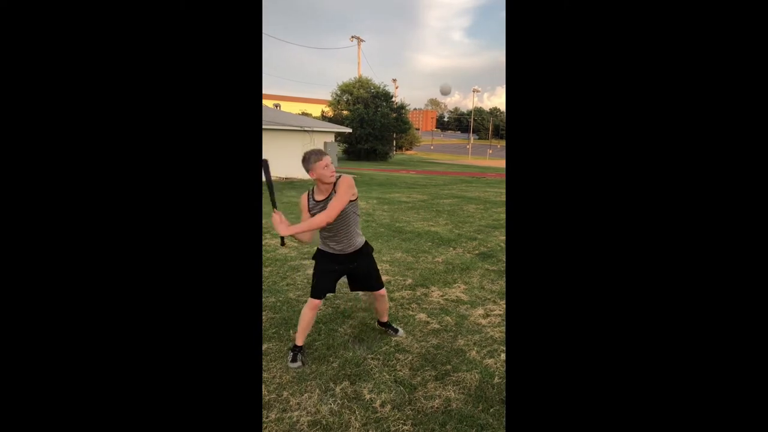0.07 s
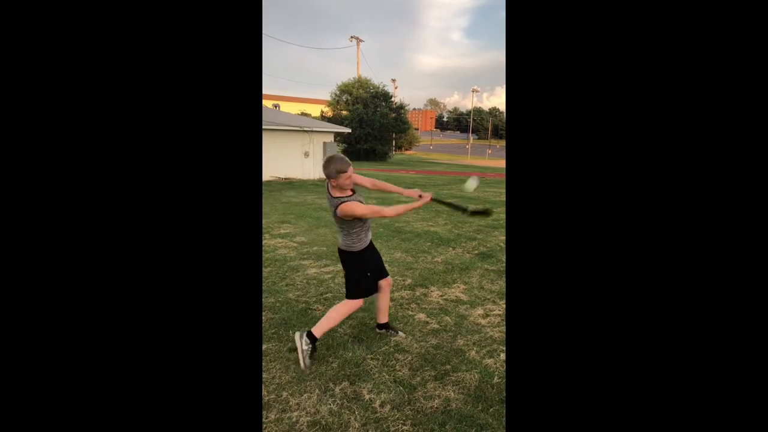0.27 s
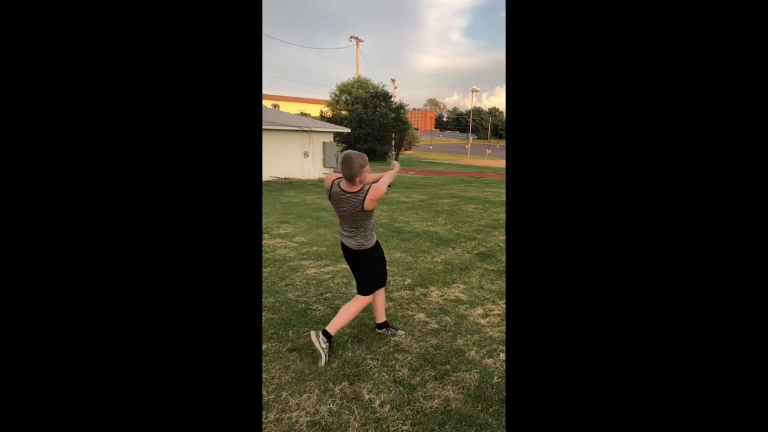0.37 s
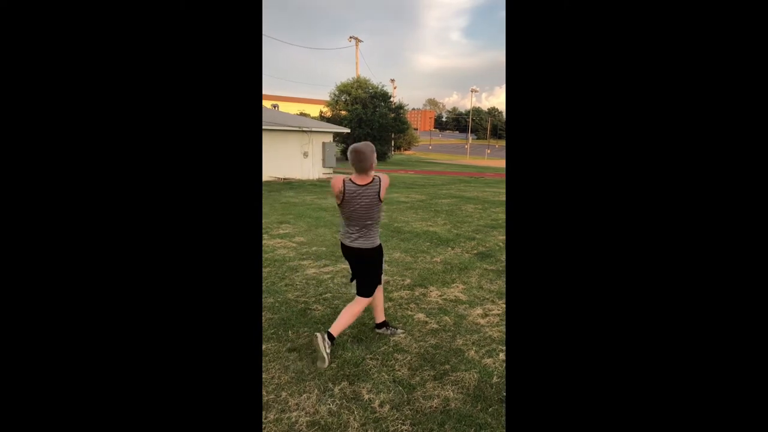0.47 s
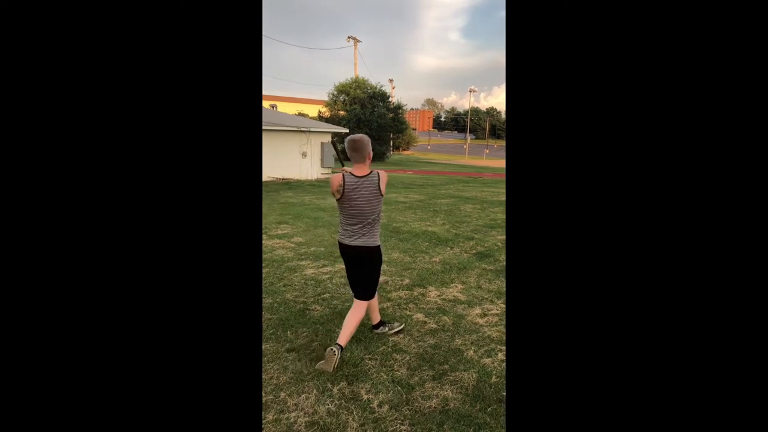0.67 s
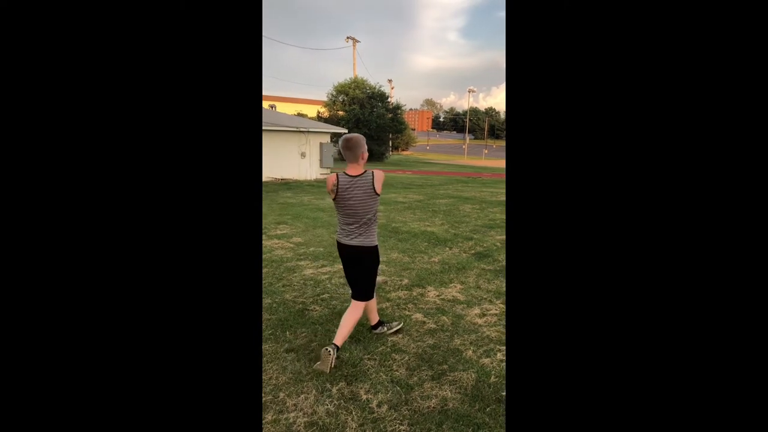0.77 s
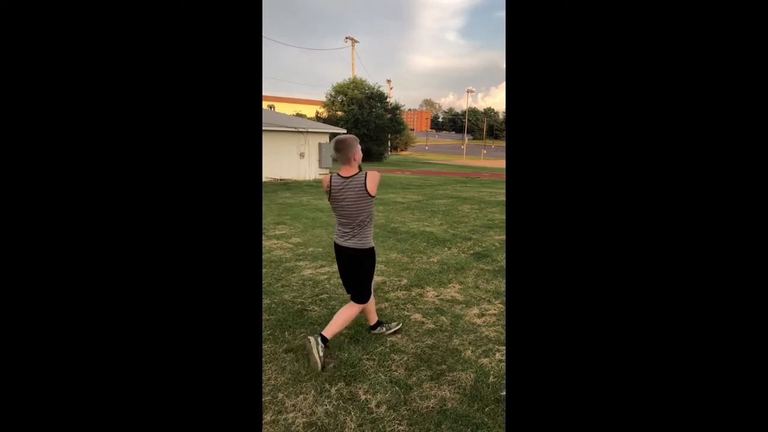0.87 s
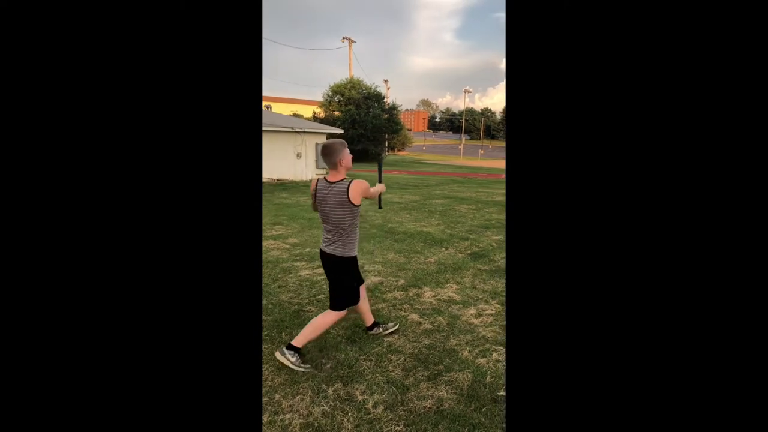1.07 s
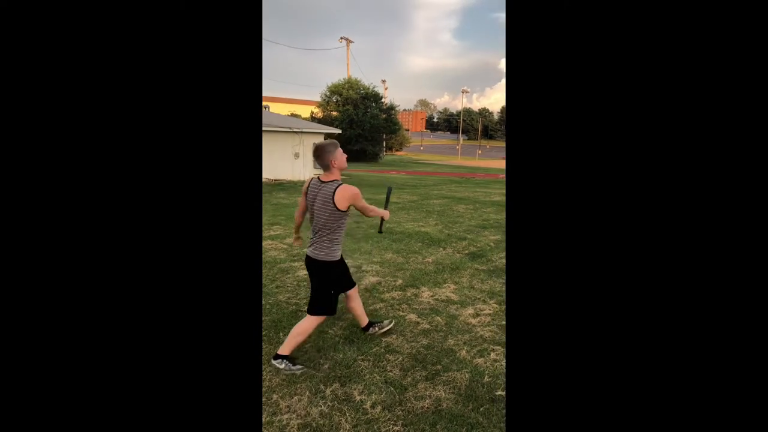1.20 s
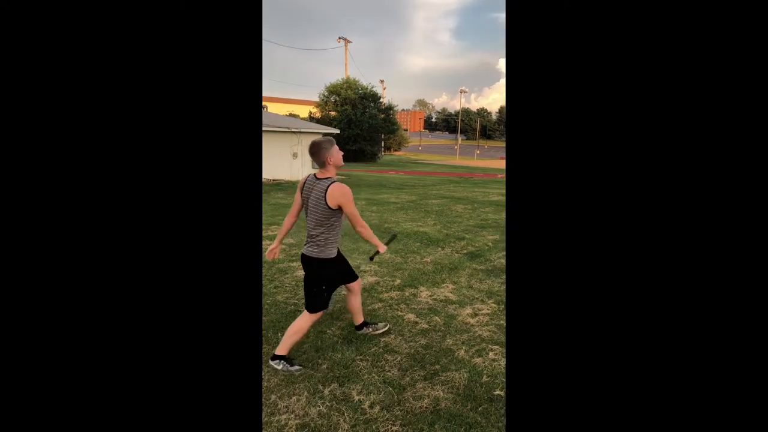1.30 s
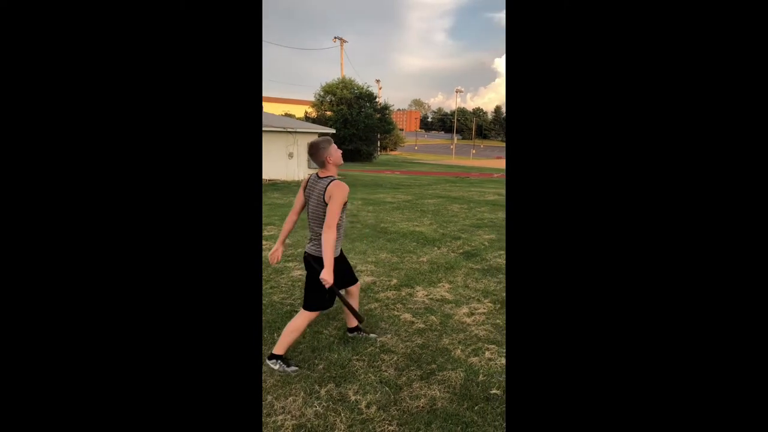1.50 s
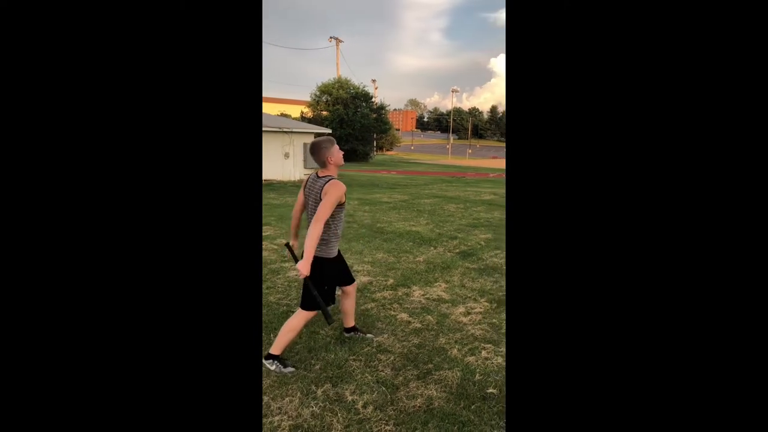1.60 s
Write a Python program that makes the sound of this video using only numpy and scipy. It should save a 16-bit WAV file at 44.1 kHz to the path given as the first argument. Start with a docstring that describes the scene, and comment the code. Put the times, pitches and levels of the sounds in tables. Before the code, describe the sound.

One sharp crack of a bat hitting a hollow ball, then soft steps in grass.

```python
"""On a lawn, close by, a light bat cracks against a hollow ball, and both ring briefly.
A duller knock follows about a tenth of a second later. Buildings and trees scatter the crack faintly.
The batter's shoes brush the grass and snap stalks. Far away, a bird whistles once,
and the tyres and engines of traffic rumble throughout."""
import sys
import numpy as np
from scipy.fft import rfft, irfft, next_fast_len
from scipy.io import wavfile
from scipy.ndimage import map_coordinates

SR = 44100
rng = np.random.default_rng(int(sys.argv[2]) if len(sys.argv) > 2 else 0)


def digitize_waveform(pressure):
    """Quantize a signal to 16-bit integers and store it at the path in sys.argv[1].

    Rows of a 2-D input are taken as channels; values are limited to [-1, 1].
    """
    field = np.atleast_2d(pressure).T
    bounded = np.clip(field, -1, 1)
    quanta = np.round(bounded * 32767).astype(np.int16)
    wavfile.write(sys.argv[1], SR, quanta)


N = 72765
T = np.arange(N) / SR
HIT_S = 0.2264  # when bat meets ball

# How much bass and treble the snap has (frequency [Hz], level [dB])
SNAP_COLOUR = [(200, -6), (600, -3.5), (1400, -6), (2500, -2.5), (6000, -3.5), (9000, -1.5), (13000, -1.5),
               (15700, 1), (16600, -23)]
# Tones of the hit (frequency [Hz], level [dB], fade time [s])
SHELL_FLEX = [(13500, -3, .0018)]  # the ball's shell bends sharply
DAMPED_TONES = [(1970, -30.5, 0.027), (2244, -25, 0.022), (2600, -17.5, 0.017), (2920, -18.5, 0.022),
                (4030, -16.5, .016), (5000, -14.5, 0.012), (5540, -8, 0.013), (5923, -14.5, 0.021),
                (7710, -25, 0.016), (8350, -19.5, 0.018), (10170, -22, 0.0099), (11860, -27.5, 0.013),
                (13700, -17, 0.0088), (14700, -19, 0.009), (15570, -19.5, .013)]  # the contact stops these at once
RINGING_TONES = [(1342, -39, .18), (2690, -28, .06), (3760, -26, .063), (3880, -34, .05), (4400, -35, .05),
                 (5103, -33, .06), (5534, -38, .065), (5981, -35, .06), (8511, -32, .04), (9399, -28, .045),
                 (10200, -30, .045), (10930, -32, .06), (12120, -34, .055)]  # bat and ball ring on
HOLLOW_POCK = [(500, -32, .018), (720, -33, .018)]  # the low note of the hollow ball


def bat_hit():
    """The bat dents the ball, its shell springs back with a second snap, and both ring."""
    snaps = click(HIT_S, SNAP_COLOUR) + amp(-2) * click(HIT_S + 0.001, SNAP_COLOUR)
    crack = amp(-15.5) * noise(SNAP_COLOUR) * fade(HIT_S, t60=0.023, attack=0.00015)
    flex = ring(HIT_S, SHELL_FLEX, attack=0.00005)
    contact = ring(HIT_S, DAMPED_TONES, attack=0.00066)
    ringing = ring(HIT_S, RINGING_TONES, attack=0.0026)
    pock = ring(HIT_S + 0.0025, HOLLOW_POCK, attack=0.00066)
    return snaps + crack + flex + contact + ringing + pock


# Crisp first echoes off the ground and the batter (delay [s], level [dB])
FIRST_ECHOES = [(.009, -14), (.0103, -18), (.0115, -19)]
# Colours of the blurred echoes (frequency [Hz], level [dB])
NEAR_COLOUR = [(300, -23), (1500, -11.5), (3000, -24), (4200, 0), (7000, -4.5), (10300, -0.5), (12500, -6),
               (15700, -0.5), (16200, -33)]  # off things close by
FAR_COLOUR = [(300, -25), (1200, 8), (2500, 2.5), (6000, -1), (15700, -6), (16100, -36)]  # off the lawn and buildings
TREE_COLOUR = [(300, -13), (1100, 11.5), (2000, 0.5), (5000, -11), (9000, -14.5), (16000, -32.5)]  # off the line of trees


def hit_echoes():
    """The crack bounces back; echoes from farther away are fainter, duller and longer."""
    ping_hz, ping_fade_s = 10180, 0.0033
    first = sum(ring(HIT_S + delay, [(ping_hz, db, ping_fade_s)], attack=0.0001)
                for delay, db in FIRST_ECHOES)
    near = amp(-25) * noise(NEAR_COLOUR) * fade(HIT_S + 0.0088, t60=0.062, attack=0.00065)
    far = amp(-40.5) * noise(FAR_COLOUR) * fade(HIT_S, t60=0.36, attack=0.025)
    trees = amp(-47) * noise(TREE_COLOUR) * fade(HIT_S, t60=1.34, attack=0.075)
    return first + near + far + trees


# Colour of the knock (frequency [Hz], level [dB])
KNOCK_COLOUR = [(200, -24), (900, -7), (2200, -8), (2700, 2), (3600, -2), (4400, 0), (5500, 4.5),
                (6500, -7.5), (8500, 1), (11000, -10.5), (15700, -5), (16000, -30)]
# Its low thud and higher tones (frequency [Hz], level [dB], fade time [s])
KNOCK_TONES = [(82, -33, 0.11), (2830, -41, 0.12), (2947, -20, 0.011), (3320, -19.5, 0.009),
               (3630, -46, 0.011), (4330, -51, .04), (4730, -41.5, 0.077)]


def knock(start=0.3165):
    """A softer, hollow contact with a low thud and a short echo."""
    contact = amp(-25.5) * noise(KNOCK_COLOUR) * fade(start, t60=0.016, attack=0.00056)
    echo = amp(-38) * noise(KNOCK_COLOUR) * fade(start + 0.0092, t60=0.064, attack=0.002)
    return contact + echo + ring(start + 0.00056, KNOCK_TONES, attack=0.00044)


# How loudly the shoes brush the grass (time [s], level [dB])
BRUSH_LEVELS = [(0, -65.5), (.04, -59), (.075, -69), (.17, -66), (.21, -55), (.36, -95), (.43, -69),
                (.6, -73.5), (.94, -77), (1.0, -67), (1.04, -71), (1.12, -64), (1.21, -72), (1.26, -63),
                (1.35, -63.5), (1.41, -78.5), (1.65, -84)]
# Stalks snapping underfoot (time [s], level [dB], brightness [0-1])
STALK_SNAPS = [(.0352, -45, 0.5), (.1375, -54, .6), (0.15, -45.5, 0), (0.203, -44, .9), (0.378, -43, .3),
               (0.41, -49, 1), (0.417, -61.5, 0.9), (0.9074, -53.5, .85), (.933, -58, 0.8),
               (1.108, -49, 0.4), (1.1318, -48, 0.6), (1.141, -48, .5), (1.287, -46.5, 0.8),
               (1.488, -53.5, 0.1), (1.613, -60.5, 0.8)]
# Colours of the grass (frequency [Hz], level [dB])
HISS_COLOUR = [(800, -3.5), (2500, -2.5), (5000, 0), (7000, -3.5), (11000, -4), (15700, -1), (16000, -37.5)]  # brushed blades
STALK_COLOUR = [(800, -10.5), (3000, 7), (5500, -2), (8000, -13.5), (16000, -25.5)]  # a thick, dull stalk
BLADE_COLOUR = [(800, -17.5), (3000, -1), (6000, 0), (10000, -0.5), (15700, 0), (16000, -30)]  # a dry, bright blade


def shoes_in_grass():
    """Shoes brush the blades with a grainy hiss and snap a few stalks."""
    hiss = noise(HISS_COLOUR) * amp(level_curve(BRUSH_LEVELS))
    grain = unit(amp(1.2 * wobble(390)))
    dull, bright = noise(STALK_COLOUR), noise(BLADE_COLOUR)
    snaps = np.zeros(N)
    for start, db, brightness in STALK_SNAPS:
        blend = dull + brightness * (bright - dull)
        snaps += amp(db) * fade(start, t60=0.013, attack=0.00037) * blend
    return hiss * grain + snaps


def bird(start=0.91, length_s=0.21, top_hz=3040, fall_hz_per_s=6200):
    """One faint falling whistle from far away."""
    age = np.clip(T - start, 0, length_s)
    pitch_hz = top_hz - fall_hz_per_s * age
    phase = 2 * np.pi * np.cumsum(pitch_hz) / SR + 0.6 * wobble(150)
    swell = np.sin(np.pi * age / length_s)
    return amp(-68) * swell * np.sin(phase)


# Colours of tyre roar and engine rumble (frequency [Hz], level [dB])
TYRE_COLOUR = [(20, -13), (60, -32.5), (110, 6.5), (200, -1.5), (330, -2), (520, 1), (700, -0.5),
               (900, -9.5), (1150, -7.5), (1500, -16.5), (2200, -22), (3200, -27.5), (5200, -33),
               (7000, -44), (15700, -47), (16000, -74.5)]
ENGINE_COLOUR = [(15, -11), (25, -49), (45, -10), (60, 0), (75, 3), (86, 6), (100, -2), (130, -15.5),
                 (300, -56.5)]
# How loud each is as time passes (time [s], level [dB])
TYRE_LEVELS = [(0, -45.5), (.55, -47.5), (.9, -47.5), (1.25, -46.5), (1.65, -47)]
ENGINE_LEVELS = [(0, -47), (.26, -53.5), (.34, -46), (.8, -45.5), (1.35, -51.5), (1.55, -46)]
# Notes the engines hum (frequency [Hz], level [dB])
ENGINE_TONES = [(85, -57.5), (158, -59), (226, -64.5), (284, -64), (377, -64.5), (496, -62), (550, -64)]


def traffic():
    """Far tyres roar while engines rumble and hum a few wavering notes."""
    roar = amp(level_curve(TYRE_LEVELS) + 0.6 * wobble(14.1)) * noise(TYRE_COLOUR)
    rumble = amp(level_curve(ENGINE_LEVELS) + 1.5 * wobble(11.46)) * noise(ENGINE_COLOUR)
    hum = np.zeros(N)
    for hz, db in ENGINE_TONES:
        strength = np.sqrt(2) * amp(db + 2 * wobble(8.1))
        hum += strength * np.sin(2 * np.pi * hz * T + 1.3 * wobble(13))
    return roar + rumble + hum


def amp(db):
    """Turn decibels into a number to multiply by."""
    return 10 ** (np.asarray(db) / 20)


def unit(x):
    """Scale a signal to an average strength (rms) of 1."""
    return x / np.sqrt(np.mean(x ** 2) + 1e-20)


def level_curve(points):
    """Join (time [s], level [dB]) points with straight lines."""
    return np.interp(T, *np.transpose(points))


def gains(colour, size):
    """Turn a colour table into one multiplier for each frequency."""
    hz, db = np.transpose(colour)
    grid_hz = np.fft.rfftfreq(size, 1 / SR)
    return amp(np.interp(np.log(grid_hz + 1), np.log(hz + 1), db))


def noise(colour):
    """Noise of strength 1; the colour sets only its balance of bass and treble."""
    size = next_fast_len(N + SR // 2)
    spectrum = rfft(rng.standard_normal(size)) * gains(colour, size)
    return unit(irfft(spectrum, size)[:N])


def wobble(rate):
    """A smooth curve through `rate` random values a second."""
    return map_coordinates(rng.standard_normal(N // 100), [T * rate + 2])


def fade(start, t60, attack):
    """Rise in about `attack` seconds and die away by 60 dB in `t60`, the fade time."""
    age = np.maximum(T - start, 0)
    return (1 - np.exp(-age / attack)) * np.exp(-np.log(1000) * age / t60)


def click(start, colour):
    """One sharp click of the given colour."""
    cepstrum = irfft(np.log(gains(colour, size=1024)))
    # Fold it in half so the click is strongest at its start.
    half = len(cepstrum) // 2
    cepstrum[1:half] *= 2
    cepstrum[half + 1:] = 0
    pulse = irfft(np.exp(rfft(cepstrum)))
    return np.pad(pulse, (int(start * SR), N))[:N]


def ring(start, tones, attack):
    """Tones that start together, each fading at its own speed."""
    return sum(amp(db) * fade(start, t60, attack) * np.cos(2 * np.pi * hz * (T - start))
               for hz, db, t60 in tones)


def scene():
    """Add all the sounds into one channel."""
    return (bat_hit() + hit_echoes() + knock() + shoes_in_grass() + bird() + traffic())[None]


def record(dry):
    """Cut away the very highest treble."""
    top_hz, slope_width_hz = 16450, 300
    size = next_fast_len(N + SR // 2)
    hz = np.fft.rfftfreq(size, 1 / SR)
    keep = np.clip((top_hz - hz) / slope_width_hz + 0.5, 0, 1)
    return irfft(rfft(dry, size) * keep, size)[:, :N]


dry = scene()
out = record(dry)
digitize_waveform(out)
```